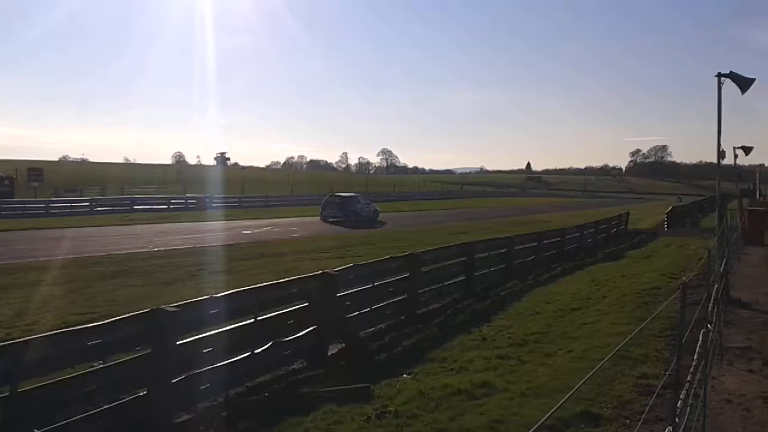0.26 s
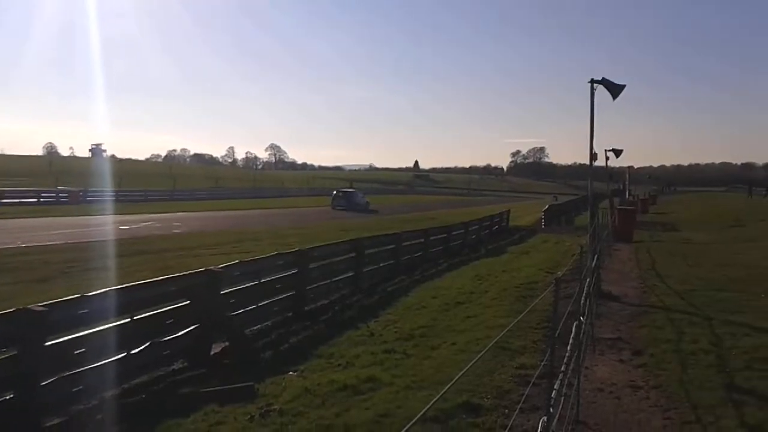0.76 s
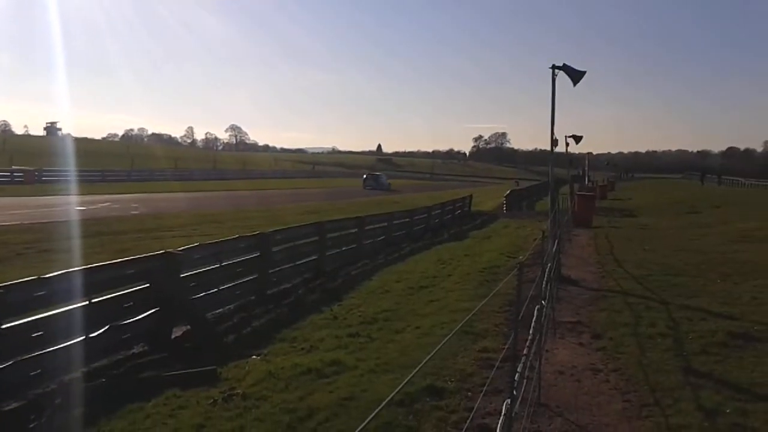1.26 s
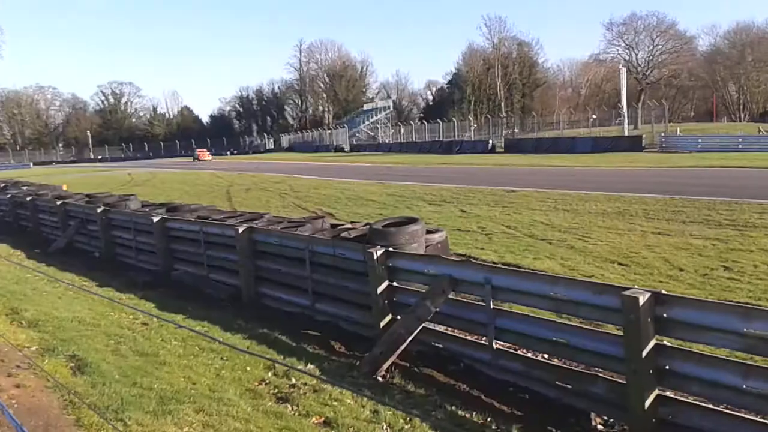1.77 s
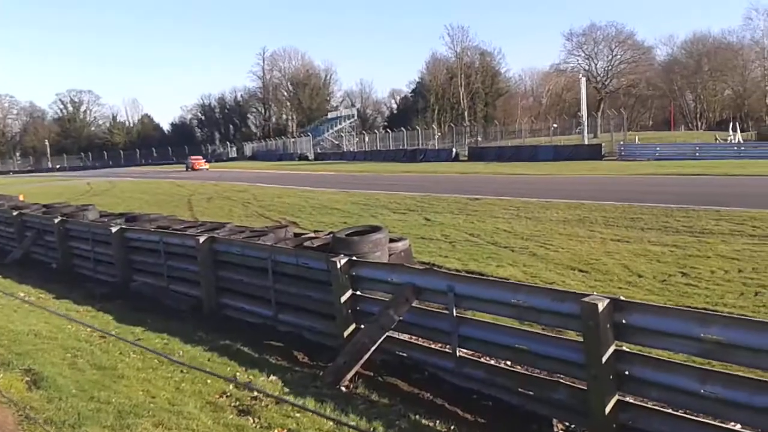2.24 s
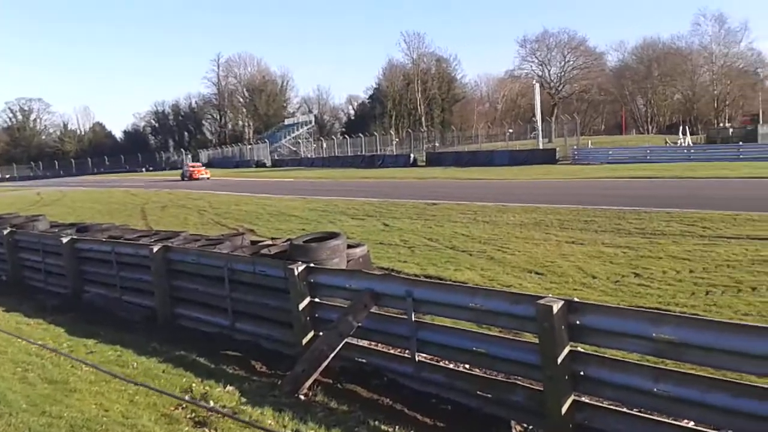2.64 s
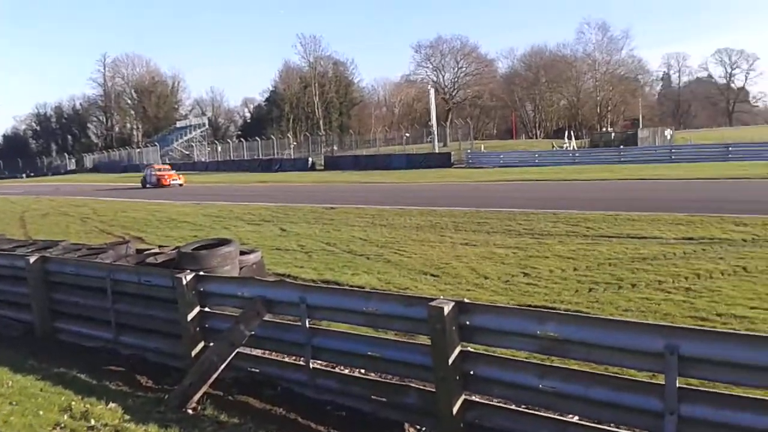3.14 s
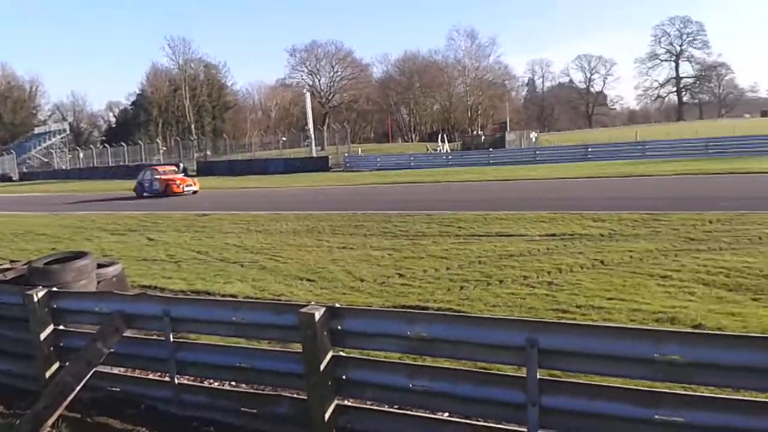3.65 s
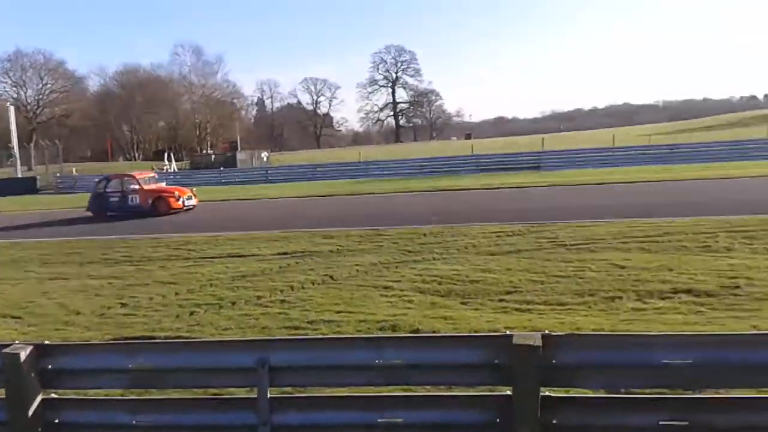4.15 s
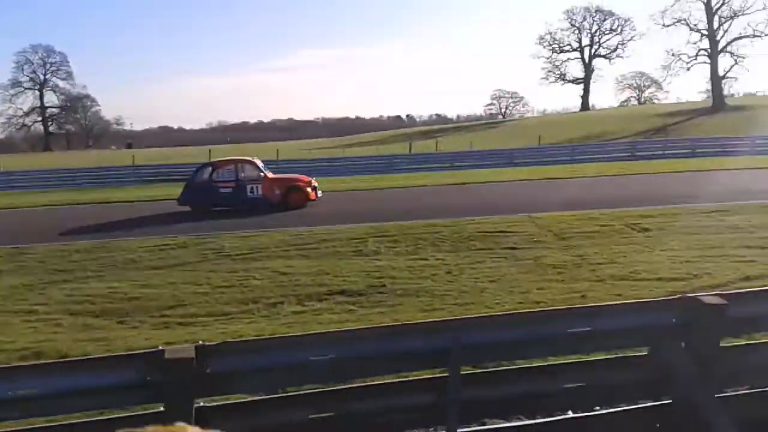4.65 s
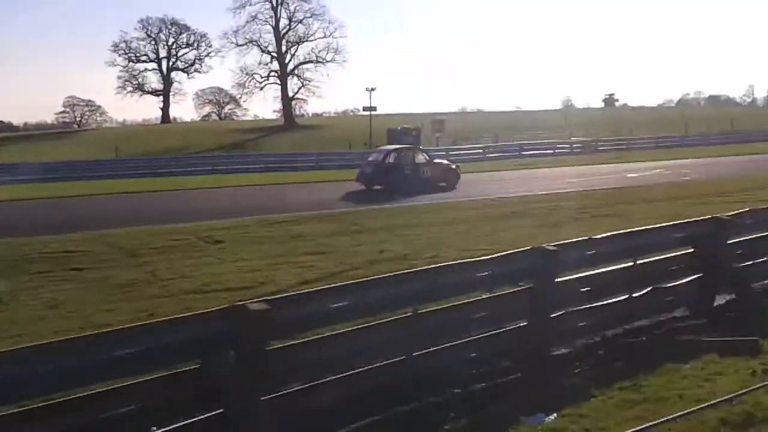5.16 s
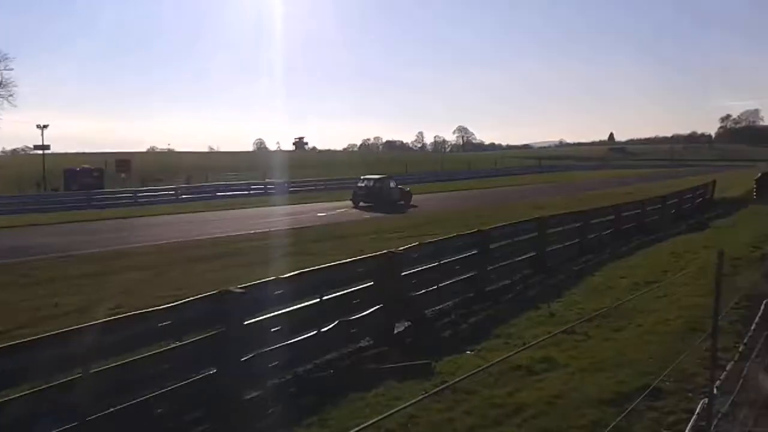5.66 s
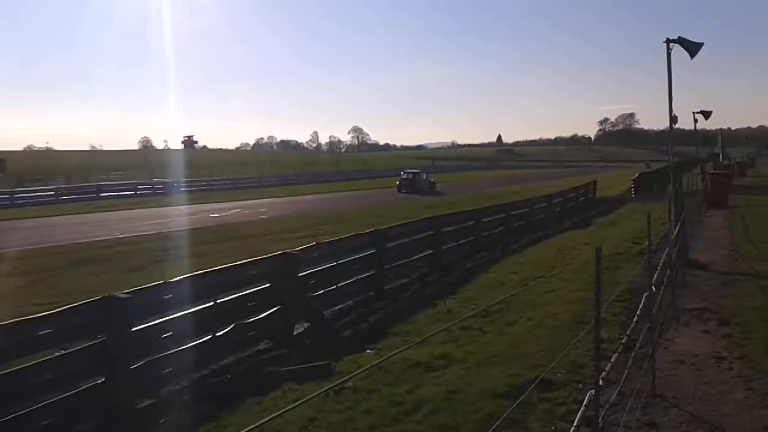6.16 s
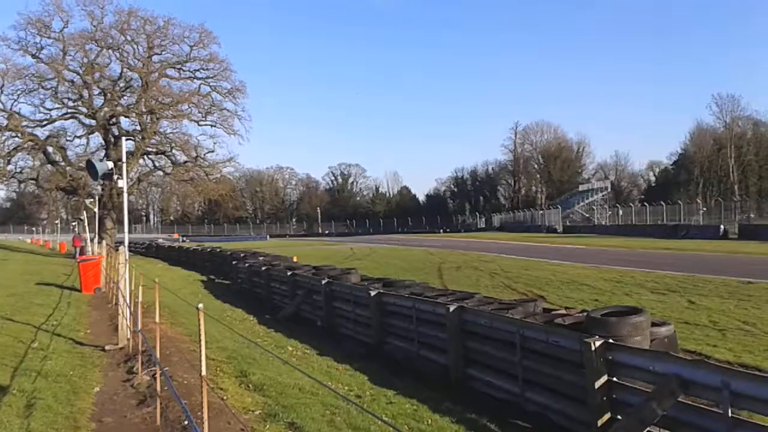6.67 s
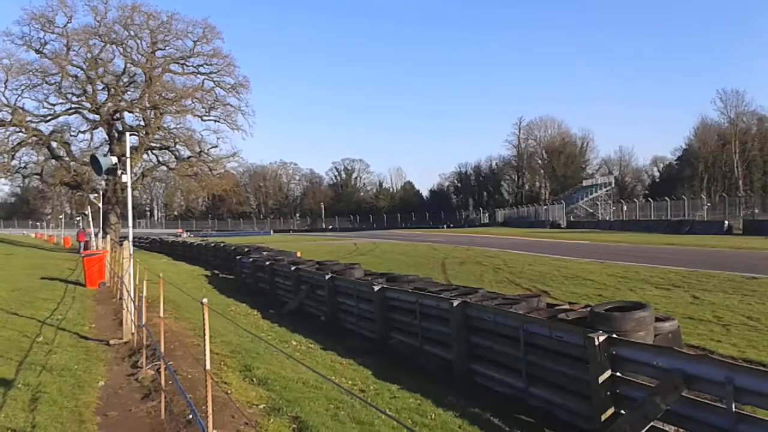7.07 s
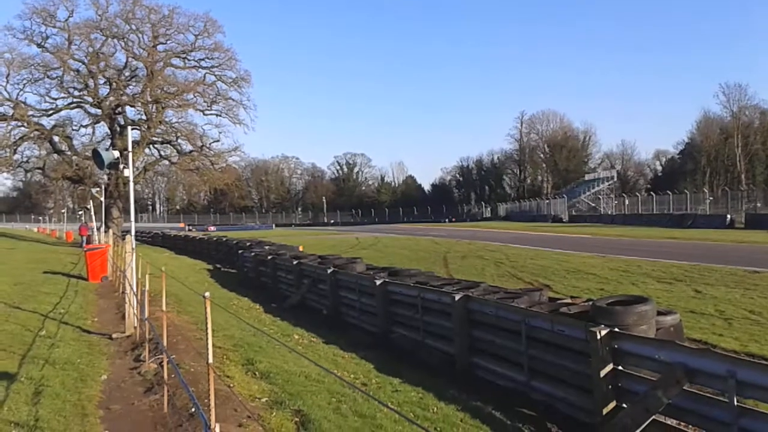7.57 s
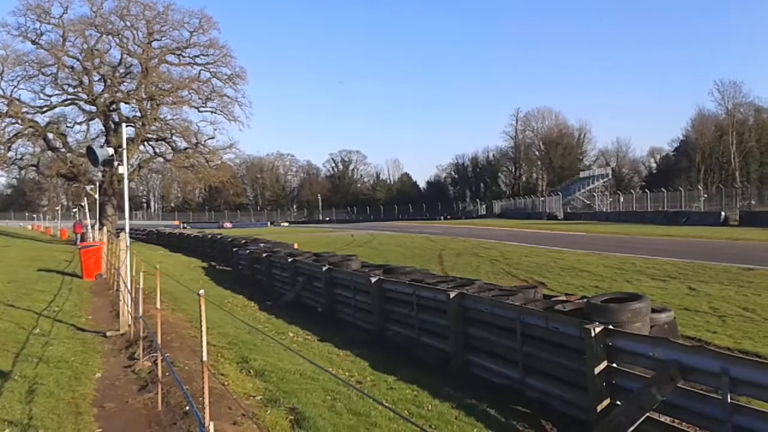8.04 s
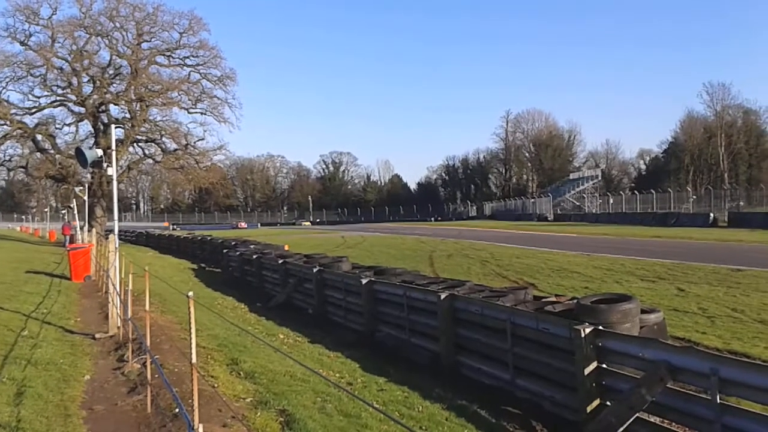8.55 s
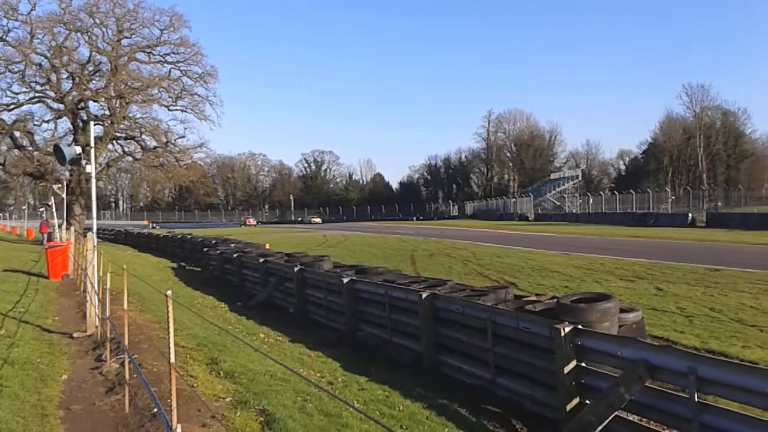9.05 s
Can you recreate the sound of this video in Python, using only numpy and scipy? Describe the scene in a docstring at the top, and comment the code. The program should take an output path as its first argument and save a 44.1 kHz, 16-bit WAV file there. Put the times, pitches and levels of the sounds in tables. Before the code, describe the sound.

Open-air racetrack from beside the barrier, three hard-cut moments. A loud four-cylinder car barks away with brief tyre squeals, then lifts off with a burble. A small air-cooled twin approaches, buzzing and clattering, gives one sharp crack, passes with a falling note and recedes. Finally, distant engines climb faintly while wind thumps the handheld microphone.

```python
"""Racing cars heard from beside the track, in three moments joined by hard cuts. First a four-cylinder car,
built from single firings ringing its exhaust pipe, pulls away and lifts off, uncovering a small air-cooled
twin ahead. Then a twin drives past flat out: sine partials for its note, noise for clatter, hiss and ticks,
with one loud sharp crack on the way. Last, far cars, made of partials alone, accelerate along the straight
while wind, made of dull noise, buffets the microphone."""
import sys
import numpy as np
from scipy import signal
from scipy.fft import rfft, irfft
from scipy.io import wavfile
from scipy.ndimage import map_coordinates

SR = 44100
rng = np.random.default_rng(int(sys.argv[2]) if len(sys.argv) > 2 else 0)


def transcribe(u):
    """Save the signal u as a 16-bit wav file named by the first command-line argument.

    u: samples, shape (n,) or (channels, n), limited to [-1, 1]; the rate is SR.
    q: integer samples, one column per channel.
    """
    v = np.clip(np.atleast_2d(u).T, -1, 1)
    q = np.round(v * 32767).astype(np.int16)
    wavfile.write(sys.argv[1], SR, q)


N = 410571
TIME = np.arange(N) / SR

# where one moment gives way to the next: t/s
CUTS_S = (1.63, 6.39)
# Levels of tone colours and orders only compare the parts of one sound; each sound is then scaled to rms 1.
# An order is a partial's multiple of the firing rate.

# --- the four-cylinder
# strength of each cylinder in firing order: level/dB
CYLINDER_DB = [2.5, 3.5, -1, -8.5]
# tone of the exhaust pipe's boom: f/Hz, level/dB
PIPE_COLOUR = [(60, -60), (120, -15.5), (155, 0.5), (180, 5.5), (215, 3.5), (270, 1.5), (335, -10.5),
               (490, -15), (700, -27.5), (2000, -88.5)]
# tone of the bark of its pressure fronts: f/Hz, level/dB
BARK_COLOUR = [(100, -44), (310, -3.5), (420, -2), (530, -1), (660, 7), (740, 3.5), (830, -0.5), (960, -6),
               (1170, -8), (1400, -38), (2000, -34), (5000, -68.5)]
# tone of the gas rasp: f/Hz, level/dB
RASP_COLOUR = [(700, -11), (1400, -18), (1750, -4), (1950, 2), (2300, -6), (2650, -10), (3200, -17),
               (3900, -16), (4350, -4), (4900, -29), (5600, -23), (6000, -15), (7800, -44), (15000, -47.5)]
# boom, bark, rasp: starting level/dB, loss in dB/s as it drives off, fall in dB/s once the throttle is shut
FOUR_LAYERS = [(-14, 4.5, 132), (-19.5, 13, 702), (-36, 30.5, 703)]
# tailpipe ring, sinking later as the car turns away: t/s, resonance f/Hz, level/dB
FOUR_RING = [(0, 2600, -40), (.2, 2650, -44), (.32, 2550, -40), (.42, 2380, -39), (.51, 2200, -39),
             (.57, 2100, -56)]
FOUR_RING_WIDTH_HZ = 190  # half width
# under power the firing rate climbs to a top value; the driver eases off, then snaps the throttle shut
FOUR_HZ, FOUR_CLIMB_HZ_PER_S, FOUR_TOP_HZ = 161.3, 13, 172.3
EASE_S, EASE_DB_PER_S, SHUT_S = 0.77, 47, .849
FRONT_LAG_S = .0026
# tyre squeals: start t/s, pitch f/Hz, slide in Hz/s, half width f/Hz, level/dB, attack t/s, decay t/s
SQUEALS = [(0.03, 1995, -800, 20, -29, .02, 0.06), (.16, 1900, -900, 20, -33.5, .05, 0.11),
           (.008, 2380, -4000, 40, -32, .005, .03), (.982, 1650, -2500, 180, -35, 0.012, 0.02)]
# run of the four-cylinder off the throttle: start t/s, end t/s, starting firing rate f/Hz,
# climb in Hz/s, loudest t/s, level/dB, fade in dB/s on either side of the loudest moment
COAST = (0.85, 1.63, 159.5, -51.5, 1, -28.5, 13)
# its partials: order, level/dB
COAST_ORDERS = [(1, 0), (1.5, -14.5), (2, -4), (3, -35), (4, -27)]
# burbles just after the throttle shuts: t/s, gain level/dB, half length t/s
BURBLES = [(.857, -11, 0.011), (.887, -3, 0.0056), (.932, 5.5, 0.0042)]
# run of the twin ahead of it: columns as in COAST
AHEAD = (0.5, 21, 91, 4.5, 2.5, -33, 3)
# its partials: order, level/dB
AHEAD_ORDERS = [(1, -22.5), (2, -3), (3, -24), (3.5, -21), (4, -8), (4.5, -19), (6, -11.5)]
# tyres and fans of this pair, before random flicker: t/s, level/dB
ROAD = [(0, -27.5), (.8, -36.5), (1.1, -40), (1.63, -40.5)]
# their tone: f/Hz, level/dB
ROAD_COLOUR = [(30, -36), (70, -6), (200, 4.5), (450, 4.5), (700, 2.5), (1400, -4), (2300, -3),
               (3200, -15.5), (4500, -21.5), (6000, -19.5), (7500, -37), (15000, -40.5)]
# reflections off body panels and the steel barrier: lag t/s, share
PANELS = [(.0011, -0.21), (.0019, -0.13), (.0031, 0.3), (.0047, 0.18)]

# --- wind, cracks and the knock
# slow gusts: t/s, level/dB, half length t/s
GUSTS = [(3.451, -43.5, 0.65), (6.0, -35.5, 0.14), (6.28, -45, 0.14), (8.82, -40.5, 0.51),
         (9.21, -33, 0.11)]
BREEZE_DB = -53  # steady wind beneath the gusts
# single buffets: t/s, peak level/dB, time in which each rises or dies by a factor e t/s
BUFFETS = [(1.593, -35, 0.024), (2.1, -32.5, .02), (3.299, -29, 0.039), (3.984, -23, 0.033),
           (5.923, -28, 0.025), (6, -30, 0.026), (6.347, -22, 0.011), (6.961, -32, 0.017),
           (7.305, -30, 0.018), (7.385, -32, 0.019), (8.101, -32, 0.012), (8.299, -31.5, 0.014),
           (8.49, -29.5, 0.0077), (8.721, -24.5, 0.019), (8.817, -24.5, 0.018), (8.897, -25, 0.019),
           (9.01, -26, 0.0084), (9.181, -19.5, 0.018)]
# tone of the wind: f/Hz, level/dB
WIND_COLOUR = [(25, -39), (70, -26), (110, -10.5), (150, 5.5), (290, 1.5), (400, -5), (600, -17.5),
               (1000, -32.5), (2500, -65.5), (8000, -72)]
# cracks from the cars and a rattle of the camera: t/s, peak level/dB, ring f/Hz, rise t/s, decay t/s
CRACKS = [(0.133, -20, 2400, .0005, .002), (.146, -24, 4200, .0004, .002), (.169, -20, 2000, .0004, .002),
          (.315, -21, 2500, .0004, .002), (2.318, -27.5, 2700, 0.001, .006),
          (3.265, -29, 5800, 0.0006, 0.0028), (3.344, -37, 6300, 0.001, 0.0026),
          (3.795, -6.5, 4320, 0.0003, 0.003), (3.81, -19, 4470, 0.0003, 0.0013),
          (4.267, -21, 930, 0.0009, 0.0054), (7.303, -29, 450, 0.0015, 0.02)]
# ringing modes of the camera's case: f/Hz, level/dB, decay t/s
CASE_MODES = [(170, -12, 0.0052), (312, 4, 0.0019), (745, -8, 0.0018)]
KNOCK_S, KNOCK_DB = 6.805, -18.5  # peak level
# the soft contact passes only this band: low f/Hz, high f/Hz
KNOCK_BAND_HZ = (110, 640)

# --- the passing twin
# when it is abreast, its speed, and its distance then
PASS_S, SPEED_M_S, NEAREST_M = 4.7, 27, 21
SOUND_M_S = 343
# revs at the source: t/s, firing rate f/Hz
TWIN_REVS = [(1.63, 87.83), (2.6, 89.4), (4.2, 91.3), (4.8, 90.75), (6.39, 91.83)]
# the side it shows the microphone: t/s, aspect (0 front, 1 side, 2 rear)
ASPECT = [(3.5, 0.034), (4.15, 1.02), (4.8, 1.24), (5.3, 1.87)]
# how it radiates, at the nearest distance: degrees from the nose, then level/dB of exhaust, clatter,
# hiss and ticking
BEAM = [(20.4, -26, -28.5, -34, -57), (37.7, -26, -28, -33, -50.5), (62.3, -24, -27, -36, -48),
        (75, -27, -30.5, -37, -51), (117, -28, -33.5, -34.5, -55.5), (137.3, -23, -35, -37.5, -48.5),
        (157.3, -23, -34.5, -36.5, -56)]
# what air and grass take from exhaust, clatter, hiss and ticking: loss in dB/m
PATH_LOSS = [.04, .19, .3, .33]
# exhaust note from the front: order, level/dB
FRONT = [(1, 3.5), (1.5, -15), (2, -9), (2.5, -25), (3, 4), (3.5, -7), (4, -8), (4.5, -15), (5, -12),
         (5.5, 2), (6, -1.5), (6.5, 2), (7, 7), (7.5, 0.5), (8, -3), (8.5, -9.5), (9, -9.5), (9.5, -11),
         (10, -14.5), (10.5, -8), (11, -12), (11.5, -8), (12, -16), (12.5, -28), (13, -30), (13.5, -27),
         (14, -30)]
# exhaust note from the side: order, level/dB
FLANK = [(1, 0.5), (1.5, -27), (2, 3), (2.5, -22), (3, 1), (3.5, -1), (4, 4.5), (4.5, -23), (5, -7),
         (5.5, -17), (6, 2), (6.5, -16), (7, -1.5), (7.5, -17), (8, 0.5), (8.5, -15), (9, -2.5), (9.5, -14),
         (10, -24), (10.5, -4), (11, -5), (11.5, -6), (12, -6.5), (12.5, -13), (13, -32), (13.5, -20),
         (14, -7)]
# exhaust note from the rear: order, level/dB
REAR = [(1, -7), (1.5, -24), (2, 2), (2.5, -22), (3, -8), (3.5, -10), (4, -21), (4.5, -30), (5, -15),
        (5.5, -30), (6, -20), (6.5, -30), (7, -8), (7.5, -23), (8, -11), (8.5, -28), (9, -20), (9.5, -32),
        (10, -19), (10.5, -27), (11, -23), (11.5, -27), (12, -21), (12.5, -30), (13, -18), (13.5, -28),
        (14, -24)]
# how far off it sounds: t/s, farness (0 near to 1 far)
FARNESS = [(2, 0.96), (3.9, 0), (5.6, 0.11), (6.39, 0.95)]
# far off, the note wavers and the grass soaks up a band of it
WAVER_DB, WAVER_S = 1.5, .00022
GRASS_HZ, GRASS_WIDTH_HZ, GRASS_DB = 682, 96, -11
# the barriers throw its note back late, still at its earlier pitch: lag t/s, share
BARRIER_ECHOES = [(.085, .24), (.19, .12)]
# tone of the engine clatter: f/Hz, level/dB
CLATTER_COLOUR = [(30, -45), (70, -33), (200, 1), (450, 4.5), (750, 6), (1100, 5.5), (1350, 5), (1600, 4),
                  (2050, 11.5), (2350, 5), (2700, -5), (3500, -28), (8000, -39)]
# tone of the tyre and fan hiss, one list each for front, side and rear: f/Hz, level/dB
HISS_COLOURS = [
    [(2000, -9.5), (2650, 4), (2950, 2.5), (3200, 0.5), (3450, -5), (3680, 0), (3830, -3), (4100, 5.5),
     (4330, -0.5), (4520, 0), (4800, 3.5), (5050, -4), (5400, -0.5), (5950, -11), (6250, -5), (6700, -18),
     (7250, -18.5), (7800, -25), (9000, -25.5)],
    [(2000, -15.5), (2800, -10), (3200, 4.5), (3700, 1.5), (4200, 3), (5400, 2), (5900, -2), (6500, -8),
     (7400, -14), (9000, -26)],
    [(2000, -12), (2750, -3), (3000, 5), (3350, 6), (3750, -12), (4300, -3), (4750, -7), (5300, -5.5),
     (6050, -7.5), (6600, -14), (7600, -19), (9000, -19)],
]
# brief swells of the hiss on the approach: t/s, gain level/dB, half length t/s
HISS_SWELLS = [(2.72, 6, 0.12), (3.58, 2.5, 0.078)]
# tone of the ticking: f/Hz, level/dB
TICKING_COLOUR = [(5000, -37), (7800, -16), (9000, -3), (10000, 0.5), (12000, -6), (15500, -24)]
# flurries of ticks from the tailpipe: t/s, gain level/dB, half length t/s
TICK_FLURRIES = [(5.45, 4, 0.018), (5.63, 6, 0.017), (5.79, 11.5, 0.032), (6.03, 16.5, 0.097)]
# sliding bands of hiss: half width f/Hz, path of (t/s, centre f/Hz, level/dB before the end fades)
SWISHES = [(231, [(3.4, 4800, -70), (4.05, 5010, -39.5), (4.4, 5380, -44), (4.8, 5800, -49),
           (5.15, 6100, -52), (5.75, 5720, -66), (6.02, 5304, -51), (6.25, 5230, -71)]),
           (300.5, [(2.1, 2800, -65), (2.75, 2764, -48), (3.2, 2712, -64)]), (243, [(4.2, 5976, -65),
           (4.6, 6270, -45), (4.9, 6480, -52), (5.4, 6740, -72)]), (304, [(1.63, 1794, -59),
           (2.4, 1889, -48.5), (2.85, 1988, -40), (3.15, 2110, -59), (3.7, 2186, -44.5), (4.3, 2256, -36),
           (4.6, 2254, -70), (5, 2200, -71)])]
# rasp of the tailpipe as the twin drives away: t/s, resonance f/Hz, level/dB
TAILPIPE = [(4.2, 1950, -75), (4.7, 2015, -37), (5.1, 2090, -39.5), (5.5, 2133, -49), (5.9, 2030, -45),
            (6.08, 2056, -59), (6.39, 2195, -49.5)]
TAILPIPE_WIDTH_HZ, OVERTONE_RATIO, OVERTONE_DB = 126, 1.57, -9.5  # half width; overtone against main ring

# --- the far circuit
# roar of the rest of the field, to be raised by 3.5 dB: t/s, level/dB
CIRCUIT = [(1.63, -47), (6.3, -48.5), (6.39, -51.5), (6.9, -52.5), (7.5, -48.5), (8.2, -50), (9.31, -44)]
# its tone: f/Hz, level/dB
CIRCUIT_COLOUR = [(30, -22.5), (75, 0.5), (120, 1), (190, 7), (260, -15.5), (420, -9.5), (680, -4.5),
                  (920, -9), (1100, -10.5), (1400, -9), (2500, -20.5), (3500, -26), (7000, -41),
                  (15000, -47)]
# runs of the far cars: columns as in COAST
FAR_CARS = [(6.39, 8.8, 132.3, 15.7, 7.54, -47, 5.9), (6.391, 7.45, 150.4, 18.2, 6.9, -51, 3.4),
            (7.801, 9.4, 131.7, 13, 9.3, -39.5, 31)]
# their partials: order, level/dB
FAR_ORDERS = [(1, -22), (2, 0.5), (3, -21), (4, -10.5), (5, -22), (6, -13)]
# run of a far twin: columns as in COAST
FAR_TWIN = (6.5, 7.5, 77, 9, 8.5, -49, 0)
# its partials: order, level/dB
FAR_TWIN_ORDERS = [(1, 0.5), (2, 3.5), (3, -7.5), (7, -10.5), (8, -10.5), (9, -15), (10, -11.5)]
# runs of more twins flat out: columns as in COAST
FAR_DRONES = [(6.4, 9.4, 96.1, 3.5, 8.25, -52.5, 6), (8.4, 9.4, 97.9, 3.5, 9.15, -49, 14)]
# their partials, only the upper ones carrying: order, level/dB
FAR_DRONE_ORDERS = [(6, -1), (7, 3.5), (8, -0.5), (9, 2.5), (12, -3.5), (13, -5), (14, -4)]

WHINE_HZ, WHINE_DB = 15700, -75  # the camera's electronics, before its top cut


def undb(db):
    """Turn decibels into a gain."""
    return 10 ** (np.asarray(db) / 20)


def unit(x):
    """Scale to rms 1."""
    return x / np.sqrt(np.mean(x ** 2))


def curves(table):
    """Join each column of a table by straight lines in time."""
    times, *columns = np.transpose(table)
    return [np.interp(TIME, times, column) for column in columns]


def during(start, end, fade=0.0021):
    """Give 1 between two times and 0 outside, with straight ramps lasting fade seconds."""
    opening = np.clip((TIME - start) / fade + 1, 0, 1)
    closing = np.clip((end - TIME) / fade + .5, 0, 1)
    return opening * closing


def swells(table):
    """Sum a bell-shaped rise and fall for each (time s, size, half length s)."""
    return sum(size * np.exp(-((TIME - s) / length) ** 2) for s, size, length in table)


def walk(rate):
    """Drift at random between new values, rate of them a second, with a spread near 1."""
    knots = rng.standard_normal(4096)
    return np.sqrt(3 / 2) * np.interp(TIME * rate, np.arange(len(knots)), knots)


def noise():
    """Make white noise."""
    return rng.standard_normal(N)


def colour(x, points):
    """Ring x through a body with the given (Hz, dB) response that never sounds ahead of time; rms 1."""
    size = 4096
    hz, db = np.transpose(points)
    freqs = np.maximum(np.fft.rfftfreq(size, 1 / SR), 1)
    response_db = np.interp(np.log(freqs), np.log(hz), db)
    # folding the cepstrum forward gives the minimum-phase response
    cepstrum = irfft(np.log(undb(response_db)))
    cepstrum[1:size // 2] *= 2
    cepstrum[size // 2 + 1:] = 0
    impulse = irfft(np.exp(rfft(cepstrum)))
    return unit(signal.oaconvolve(x, impulse)[:N])


def noise_band(hz, width):
    """Shift dull noise up to a moving centre, making a band of noise around it."""
    dull = colour(noise(), [(width, 0), (6 * width, -32), (30 * width, -70)])
    carrier = np.sin(2 * np.pi * np.cumsum(hz) / SR)
    return unit(dull * carrier)


def reflect(x, stretch):
    """Add near reflections, which comb the sound; the comb slides as their paths stretch."""
    echoes = sum(share * np.interp(TIME - lag * stretch, TIME, x) for lag, share in PANELS)
    return unit(x + echoes)


def firings(hz, wobble):
    """Keep a running count of the firings of a slightly unsteady engine."""
    return np.cumsum(hz * (1 + wobble * walk(45))) / SR


def pulse_train(at, size):
    """Place clicks at fractional sample positions, each shared between two samples."""
    pulses = np.zeros(N + 1)
    whole, part = at.astype(int), at % 1
    pulses[whole] += size * (1 - part)
    pulses[whole + 1] += size * part
    return unit(pulses[:N])


def puffs(turn, length, scatter_db):
    """Burst noise at every firing, each burst of its own strength; length is a share of the firing gap."""
    strength = undb(scatter_db * rng.standard_normal(4096))
    decay = np.exp(-(turn % 1) / length)
    return unit(noise() * decay * strength[turn.astype(int) % 4096])


def note(turn, orders, levels_db, fading_db, rough):
    """Sum exhaust partials; each fades over the ground and flutters, the high ones most."""
    coarse, out, power = TIME[::64], 0, 0
    for order, db in zip(orders, levels_db):
        fade, flutter = rng.standard_normal((2, 1024))
        fade = map_coordinates(fade, [coarse * 7], order=1, mode="wrap")
        path_db = fading_db * np.tanh(order / 4) * fade
        # half orders come from the mismatch of the cylinders, which changes from cycle to cycle
        unsteady = rough * np.sqrt(order) * (3 if order % 1 else 1)
        slip = unsteady * map_coordinates(flutter, [coarse * 40], order=1, mode="wrap")
        gain = undb(db)
        phase = 2 * np.pi * (order * turn + rng.random()) + np.interp(TIME, coarse, slip)
        out = out + gain * np.interp(TIME, coarse, undb(path_db)) * np.sin(phase)
        power = power + gain ** 2 / 2
    return out / np.sqrt(power)


def distant_engine(run, orders, fading_db, rough):
    """Play an engine of which only the note carries; its revs change at a steady pace."""
    start, end, start_hz, climb, loudest, db, fade = run
    hz = start_hz + climb * (np.clip(TIME, start, end) - start)
    tone = note(firings(hz, wobble=0.00263), *np.transpose(orders), fading_db, rough)
    level_db = db - fade * np.abs(TIME - loudest)
    return tone * undb(level_db) * during(start, end, fade=0.015)


def four_ring(blown):
    """Each firing, as strong as its cylinder, swells a short burst at the tailpipe's resonance."""
    hz, db = curves(FOUR_RING)
    spit = np.exp(-(blown % 1) / .25) * undb(CYLINDER_DB)[blown.astype(int) % 4]
    # rounding off the sharp start makes it swell
    spit = signal.sosfilt(signal.butter(2, 400, fs=SR, output="sos"), spit)
    return unit(noise_band(hz, FOUR_RING_WIDTH_HZ) * spit) * undb(db) * during(0, SHUT_S)


def four_cylinder():
    """Four unequal firings a cycle ring the pipe; the strong ones steepen into a bark; gas rasps after each."""
    hz = np.minimum(FOUR_HZ + FOUR_CLIMB_HZ_PER_S * TIME, FOUR_TOP_HZ)
    turn = firings(hz, wobble=0.0025) + 1
    count = np.arange(1, int(turn[-1]))
    at = np.interp(count, turn, np.arange(N))
    size_db = np.array(CYLINDER_DB)[count % 4] + 1.0 * rng.standard_normal(len(count))
    boom = colour(pulse_train(at, undb(size_db)), PIPE_COLOUR)
    # the steep front rides on the crest of the boom, a little after the valve opens
    late = np.minimum(at + FRONT_LAG_S * SR, N - 1)
    fronts = pulse_train(late, undb(1.23 * size_db))
    blown = turn - FRONT_LAG_S * hz
    cylinder_gain = undb(CYLINDER_DB)[blown.astype(int) % 4]
    gas = unit(cylinder_gain * puffs(blown, length=.15, scatter_db=1.5))
    bark = colour(undb(-13) * gas - fronts, BARK_COLOUR)
    rasp = reflect(colour(gas + undb(-8) * fronts, RASP_COLOUR), stretch=1 + 0.28 * TIME)
    ease_db = -EASE_DB_PER_S * np.clip(TIME - EASE_S, 0, 1)
    shut = np.clip(TIME - SHUT_S, 0, 1)
    out = four_ring(blown)
    for layer, (db, loss, fall) in zip((boom, bark, rasp), FOUR_LAYERS):
        out = out + layer * undb(db - loss * TIME + ease_db - fall * shut)
    return out


def squeals():
    """Tyres scrub in the bend: a narrow, unsteady ring that slides down and fades."""
    out = 0
    for s, hz, slide, width, db, attack, decay in SQUEALS:
        age = TIME - s
        ring = noise_band(hz + slide * np.clip(age, -2 * attack, 2 * decay), width)
        out = out + ring * undb(db) * np.exp(np.minimum(age / attack, -age / decay))
    return out


def leaving_pair():
    """The four-cylinder lifts off and runs down while the twin ahead keeps pulling; tyres and fans are noise."""
    road_db, = curves(ROAD)
    coast = distant_engine(COAST, COAST_ORDERS, fading_db=2, rough=.26)
    coast = coast * undb(swells(BURBLES) + 1.8 * walk(40))
    ahead = distant_engine(AHEAD, AHEAD_ORDERS, fading_db=2.5, rough=.2) * undb(2.5 * walk(11))
    road = colour(noise(), ROAD_COLOUR) * undb(road_db + 1.64 * walk(20.2))
    return four_cylinder() + squeals() + coast + ahead + road


def wind():
    """Eddies shake the microphone, heard as dull noise in ragged gusts and single thumps."""
    gusts = swells((s, undb(db), length) for s, db, length in GUSTS)
    strength = np.hypot(undb(BREEZE_DB), gusts)
    flutter_db = 2.2 * walk(35)
    out = colour(noise(), WIND_COLOUR) * strength * undb(flutter_db)
    eddies = colour(noise(), WIND_COLOUR)
    for s, peak_db, length in BUFFETS:
        near = np.flatnonzero(np.abs(TIME - s) < 10 * length)
        thump = eddies[near] * np.exp(-np.abs(TIME[near] - s) / length)
        out[near] += undb(peak_db) * thump / np.abs(thump).max()
    return out


def cracks():
    """Short noise bursts with one broad ring and a faint scatter off the barriers."""
    out = np.zeros(N)
    age = np.arange(-SR // 20, SR // 5) / SR
    after = np.maximum(age, 0)
    scatter = undb(-19) * np.exp(-after / 0.025)
    for s, peak_db, hz, rise, decay in CRACKS:
        shape = np.exp(np.minimum(age, 0) / rise) * (np.exp(-after / decay) + scatter)
        burst = rng.standard_normal(len(age)) * shape
        hump = [(hz / 5, -17), (hz / 2, -7), (hz, 0), (hz * 1.5, -10), (hz * 2.5, -23), (hz * 10, -50)]
        ring = colour(burst, hump)[:len(age)]
        start = int((s + age[0]) * SR)
        out[start:start + len(age)] += undb(peak_db) * ring / np.abs(ring).max()
    return out


def twin_path():
    """Find the heard firing rate and four layer levels from distance, bearing and Doppler shift."""
    along = SPEED_M_S * (TIME - PASS_S)
    distance = np.hypot(along, NEAREST_M)
    degrees = np.degrees(np.arccos(-along / distance))
    revs, = curves(TWIN_REVS)
    hz = revs / (1 + SPEED_M_S / SOUND_M_S * along / distance)
    spreading_db = 20 * np.log10(NEAREST_M / distance)
    angles, *beams = np.transpose(BEAM)
    levels = []
    for beam, loss in zip(beams, PATH_LOSS):
        levels.append(np.interp(degrees, angles, beam) + spreading_db - loss * (distance - NEAREST_M))
    return hz, levels


def twin_note(turn, hz, aspect):
    """Blend the partials from nose to tailpipe, soften them when far, and add barrier echoes."""
    orders = np.transpose(FRONT)[0]
    sides = np.array([np.interp(orders, *np.transpose(side)) for side in (FRONT, FLANK, REAR)])
    far, = curves(FARNESS)
    levels = []
    for order, db in zip(orders, sides.T):
        grass_db = GRASS_DB * np.exp(-((order * hz - GRASS_HZ) / GRASS_WIDTH_HZ) ** 2)
        levels.append(np.interp(aspect, np.arange(3), db) + far * grass_db)
    wavering = turn + far * WAVER_S * hz * walk(24)
    tone = note(wavering, orders, levels, fading_db=2.5, rough=.12) * undb(far * WAVER_DB * walk(16))
    # alongside, an echo off the near barrier draws out and sweeps notches through the partials
    alongside = np.clip(1 - np.abs(aspect - 1), 0, 1)
    echo = np.interp(TIME - 0.0706 * (hz.max() / hz - 1), TIME, tone)
    share = .5 * alongside
    late = sum(part * np.interp(TIME - lag, TIME, tone) for lag, part in BARRIER_ECHOES)
    return (tone + share * echo + alongside * late) / np.hypot(1, share)


def tailpipe(turn):
    """Each firing, strong and weak in turn, spits gas through a drifting resonance of the tailpipe."""
    hz, db = curves(TAILPIPE)
    spit = np.exp(-(turn % 1) / .28) * undb(-4 * (turn.astype(int) % 2) + 1.3 * walk(30))
    overtone = noise_band(hz * OVERTONE_RATIO, TAILPIPE_WIDTH_HZ)
    ring = noise_band(hz, TAILPIPE_WIDTH_HZ) + undb(OVERTONE_DB) * overtone
    return unit(ring * spit) * undb(db)


def swishes():
    """Bright bands of hiss slide, swell and fade as the car goes by."""
    out = 0
    for width, path in SWISHES:
        hz, db = curves(path)
        out = out + noise_band(hz, width) * undb(db) * during(path[0][0], path[-1][0], fade=.3)
    return out


def passing_twin():
    """The note drops and turns from nose to tailpipe; clatter, hiss and ticks beat with the firings."""
    hz, (exhaust_db, clatter_db, hiss_db, tick_db) = twin_path()
    aspect, = curves(ASPECT)
    turn = firings(hz, wobble=0.002)
    exhaust = twin_note(turn, hz, aspect) * undb(exhaust_db)
    clatter = colour(puffs(turn, length=0.99, scatter_db=2.0) + 1.02 * noise(), CLATTER_COLOUR)
    rush = puffs(turn, length=1.0, scatter_db=3.5) + 1.74 * noise()
    hiss = 0
    for k, side in enumerate(HISS_COLOURS):
        hiss = hiss + colour(rush, side) * np.clip(1 - np.abs(aspect - k), 0, 1)
    # the sharp ticks of the tailpipe beam backwards
    rear = np.clip(aspect - 1, 0, 1)
    sharp = puffs(turn, length=0.092, scatter_db=2.0) * (0.12 + 1.6 * rear) + noise() * (1 - 0.17 * rear)
    sharp = sharp * undb(0.6 * rear * walk(28))  # they come in ragged bursts
    ticks = colour(sharp, TICKING_COLOUR)
    stretch = hz.max() / hz  # Doppler slides the whole comb down with the note
    out = exhaust + tailpipe(turn) + swishes()
    out = out + reflect(clatter, stretch) * undb(clatter_db)
    out = out + reflect(hiss, stretch) * undb(hiss_db + swells(HISS_SWELLS))
    return out + reflect(ticks, stretch) * undb(tick_db + swells(TICK_FLURRIES))


def circuit_roar():
    """The rest of the field, blurred by distance and trees into coloured noise."""
    roar_db, = curves(CIRCUIT)
    return colour(noise(), CIRCUIT_COLOUR) * undb(roar_db + 3.5 + 0.47 * walk(16))


def far_cars():
    """Several cars climb through the revs along the far straight, each a sum of partials."""
    cars = sum(distant_engine(car, FAR_ORDERS, fading_db=5.0, rough=0.1) for car in FAR_CARS)
    drones = sum(distant_engine(car, FAR_DRONE_ORDERS, fading_db=4, rough=.12) for car in FAR_DRONES)
    return cars + drones + distant_engine(FAR_TWIN, FAR_TWIN_ORDERS, fading_db=6.0, rough=0.072)


def knock():
    """A single dull bump rings the camera's case for a few cycles."""
    age = np.maximum(TIME - KNOCK_S, 0)
    ring = 0
    for hz, db, decay in CASE_MODES:
        ring = ring + undb(db) * np.exp(-np.minimum(age / decay, 20)) * np.sin(2 * np.pi * hz * age)
    contact = signal.butter(2, KNOCK_BAND_HZ, "bandpass", fs=SR, output="sos")
    ring = signal.sosfilt(contact, ring)
    return undb(KNOCK_DB) * ring / np.abs(ring).max()


def scene():
    """Play the three moments in turn, with wind and a faint even hiss throughout."""
    first, second = CUTS_S
    cars = leaving_pair() * during(0, first)
    cars = cars + passing_twin() * during(first, second)
    cars = cars + far_cars() * during(second, 10)
    roar = circuit_roar() * during(first, 10)
    even_hiss = undb(-70.0) * noise()
    return (cars + roar + cracks() + knock() + wind() + even_hiss)[None]


def record(dry):
    """The camera adds a faint electronic whine and cuts the top."""
    whine = undb(WHINE_DB) * unit(np.sin(2 * np.pi * WHINE_HZ * TIME))
    top_cut = signal.ellip(10, .2, 80, 15800, fs=SR, output="sos")
    return signal.sosfilt(top_cut, dry + whine)


dry = scene()
out = record(dry)
transcribe(out)
```